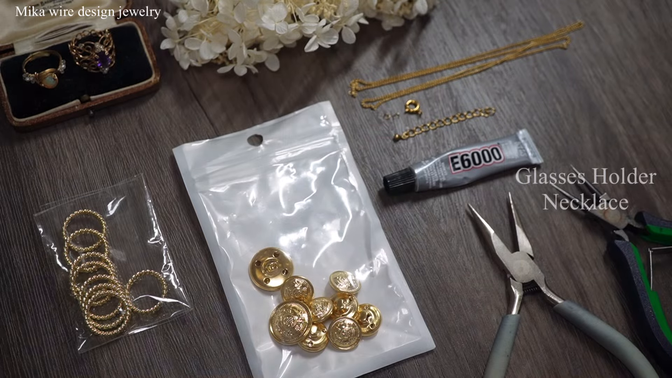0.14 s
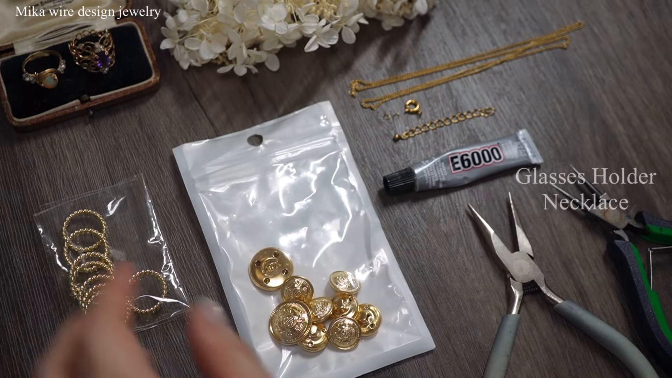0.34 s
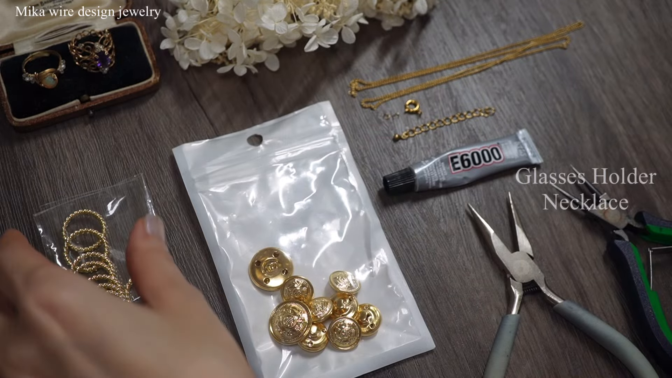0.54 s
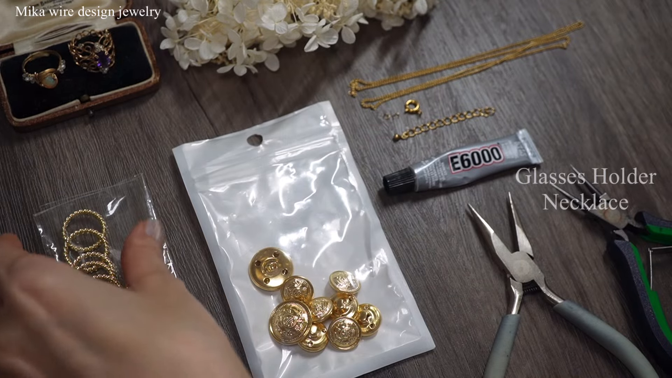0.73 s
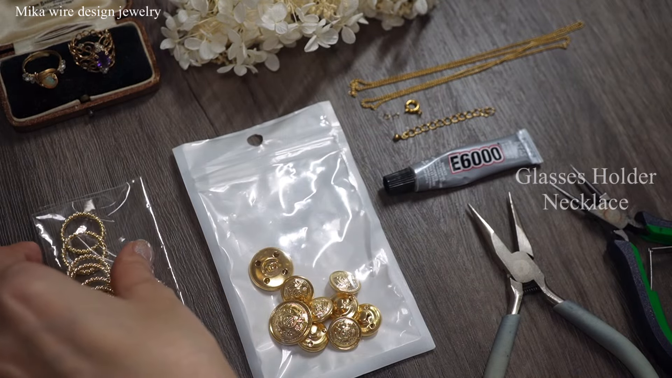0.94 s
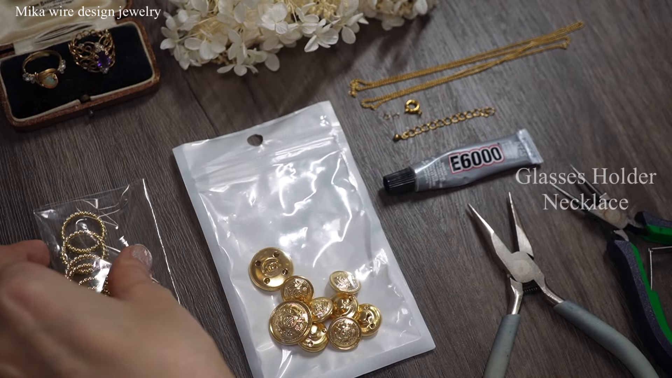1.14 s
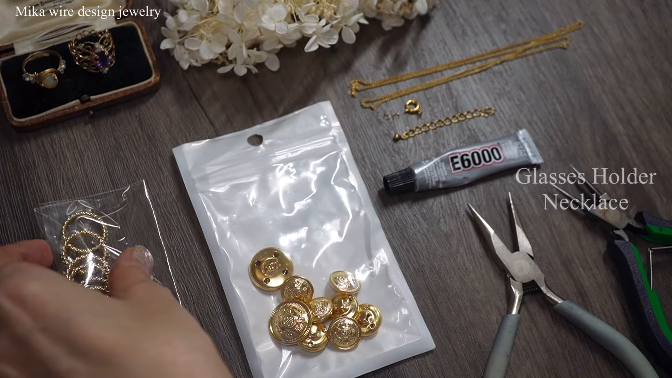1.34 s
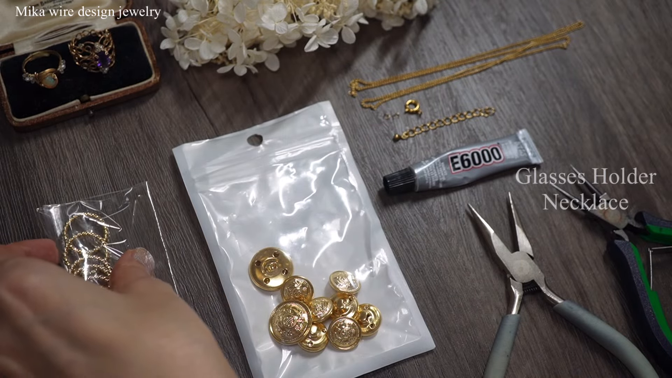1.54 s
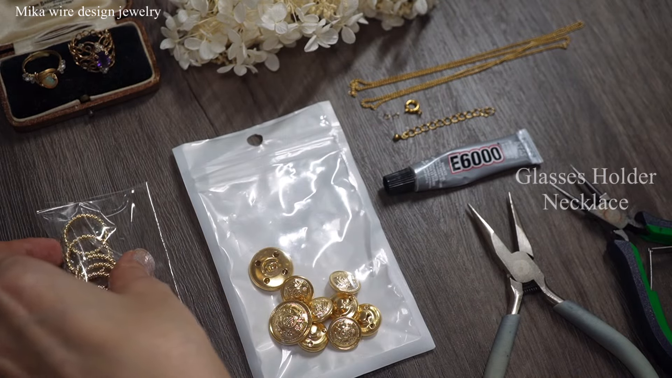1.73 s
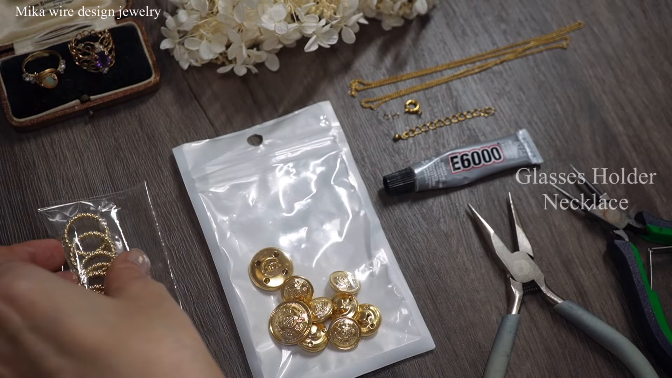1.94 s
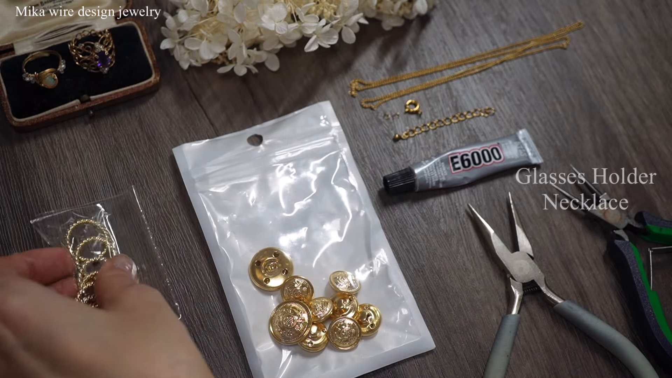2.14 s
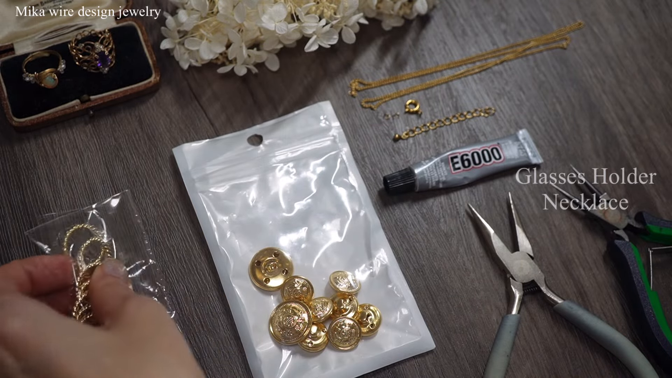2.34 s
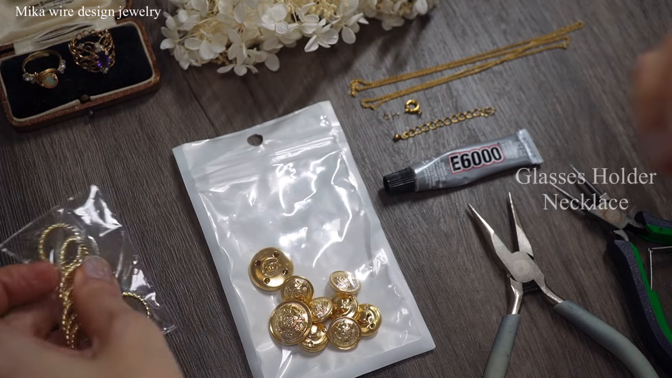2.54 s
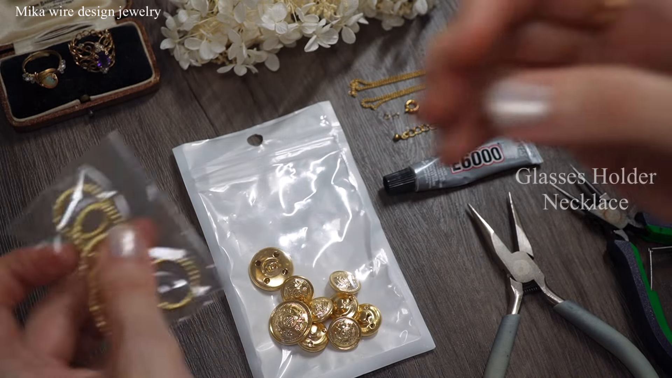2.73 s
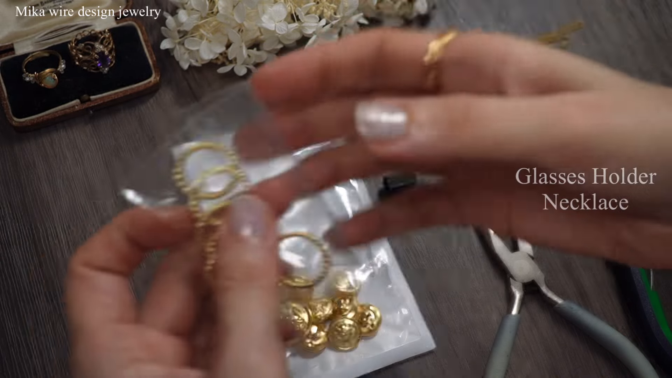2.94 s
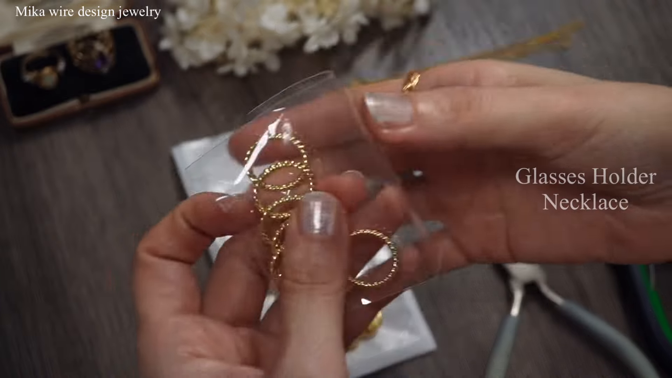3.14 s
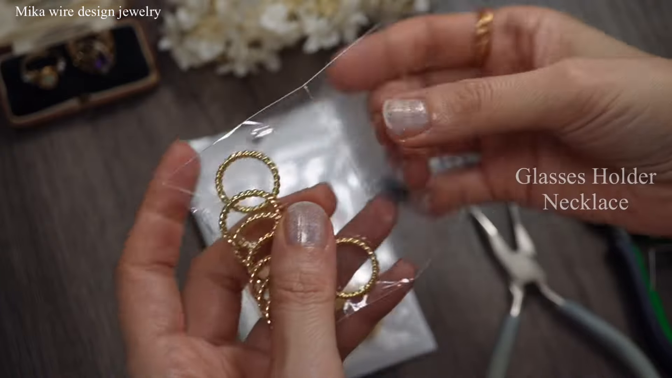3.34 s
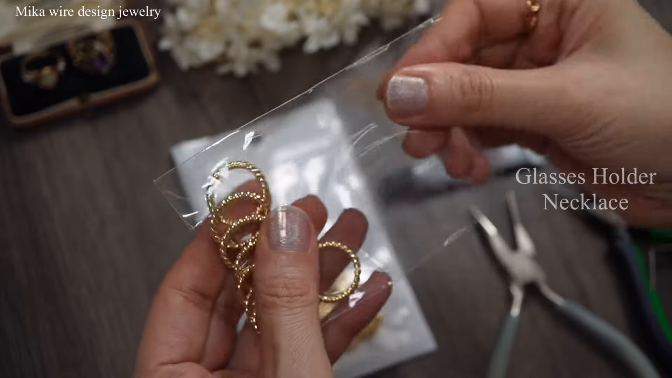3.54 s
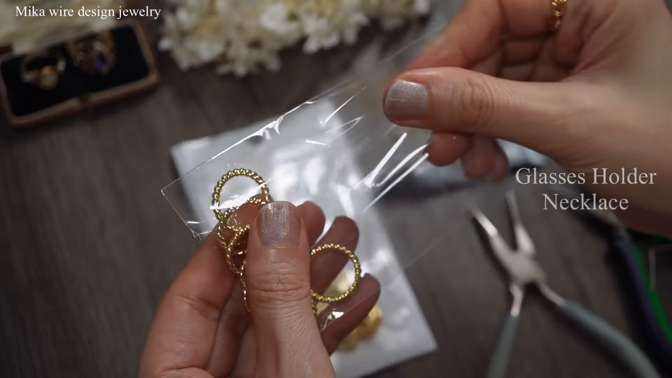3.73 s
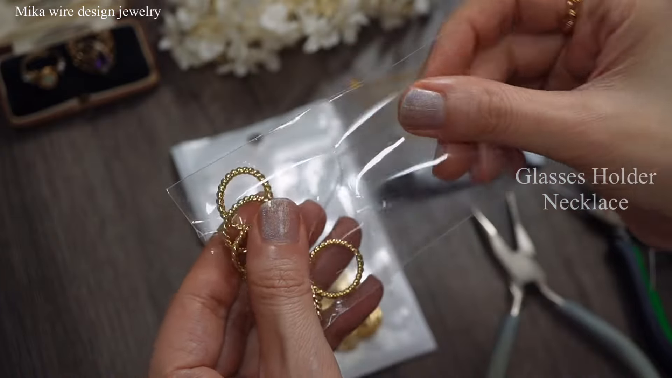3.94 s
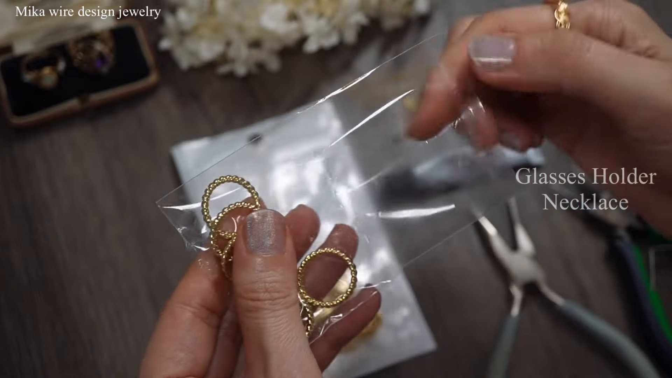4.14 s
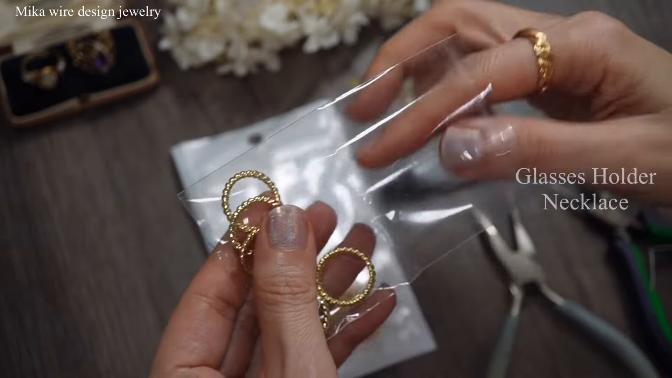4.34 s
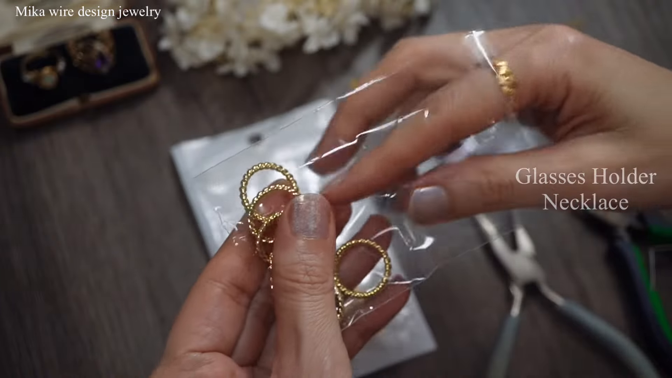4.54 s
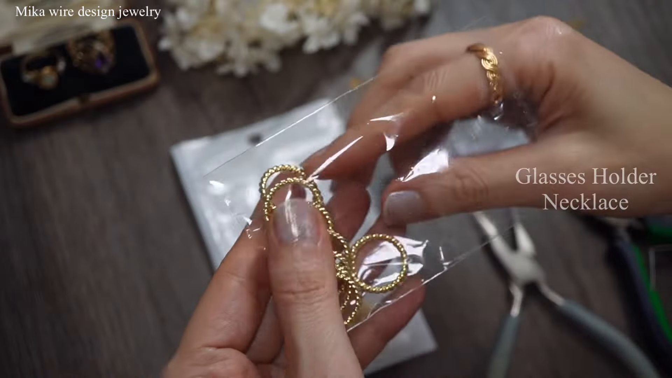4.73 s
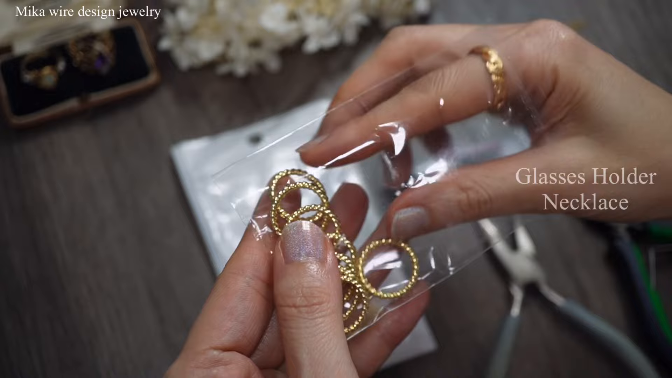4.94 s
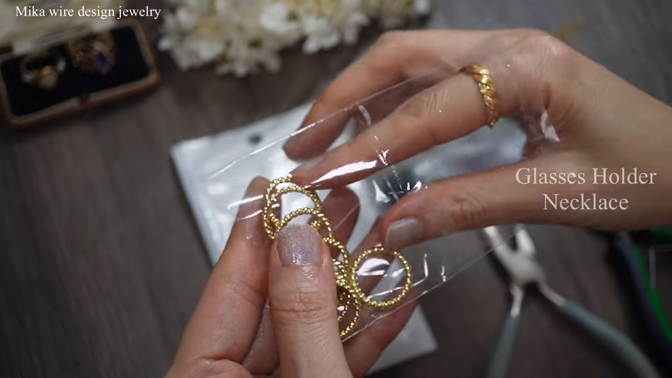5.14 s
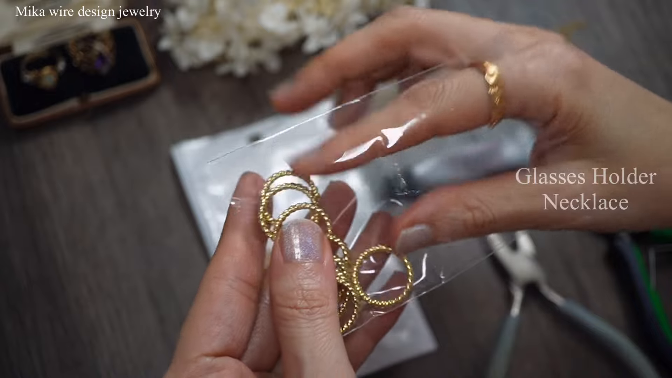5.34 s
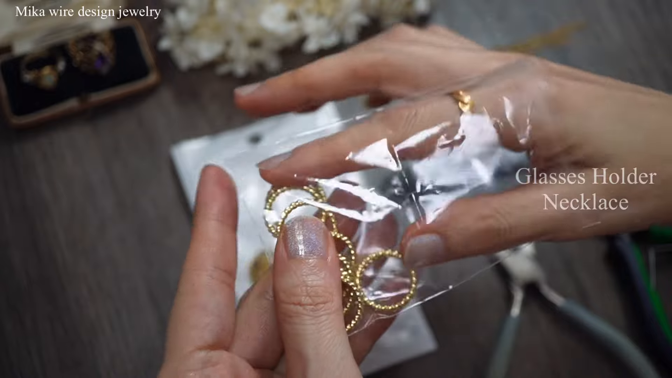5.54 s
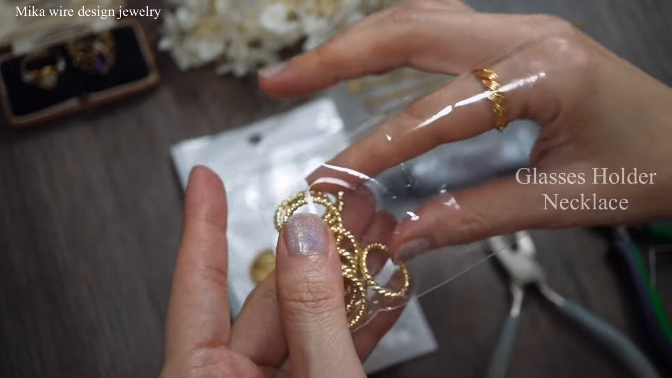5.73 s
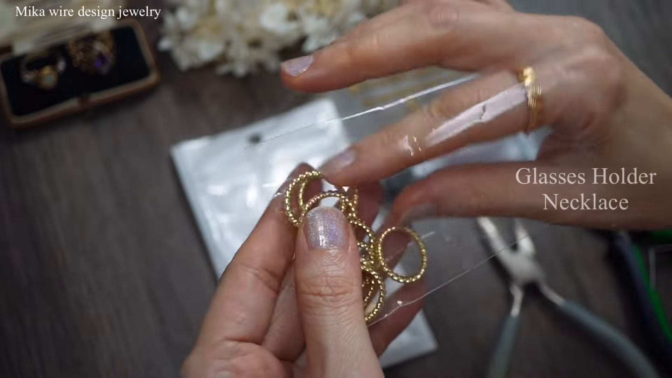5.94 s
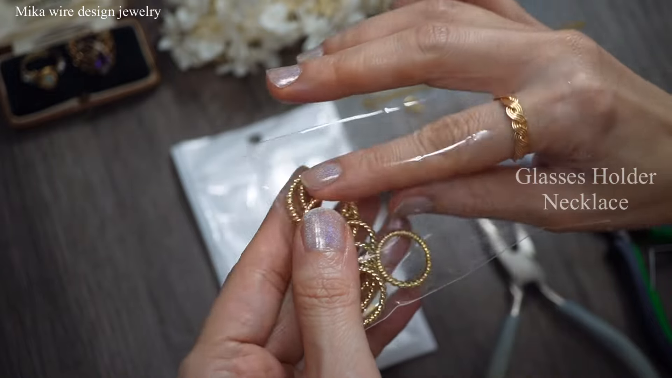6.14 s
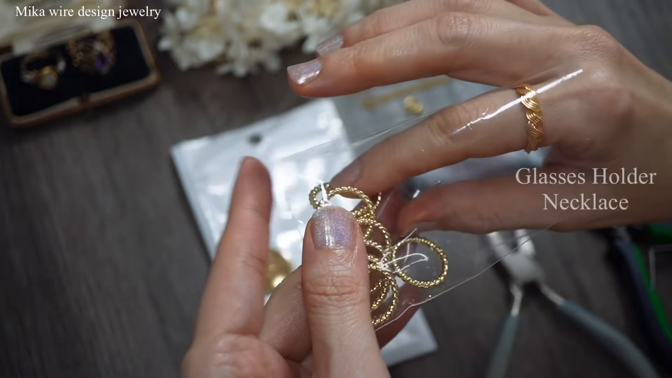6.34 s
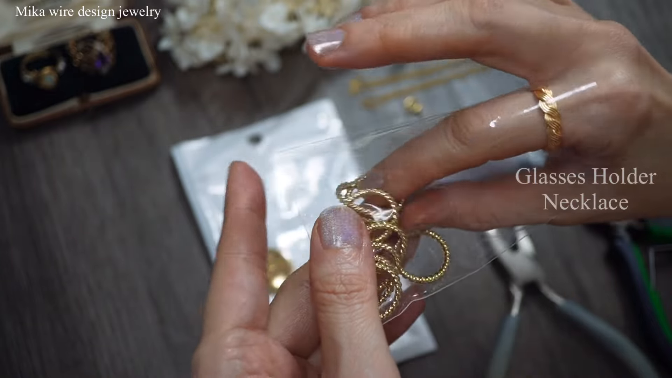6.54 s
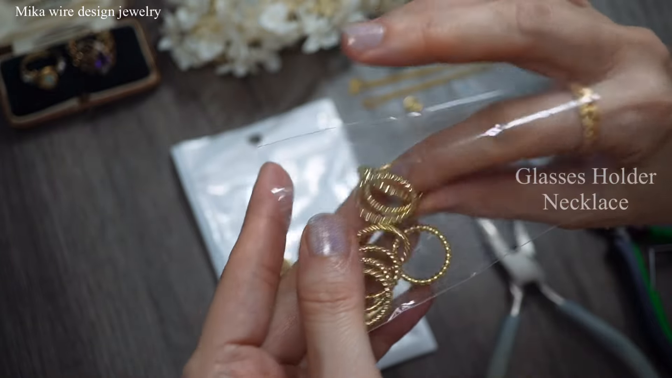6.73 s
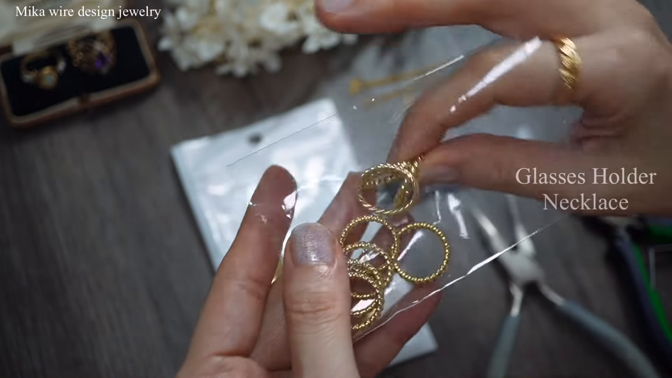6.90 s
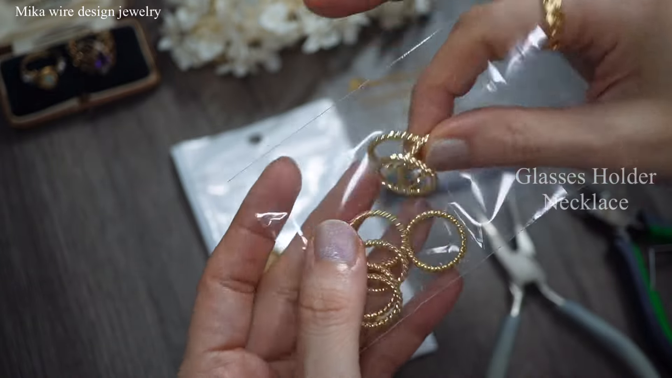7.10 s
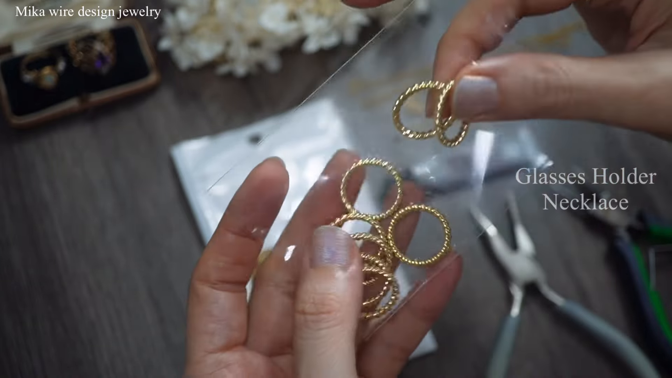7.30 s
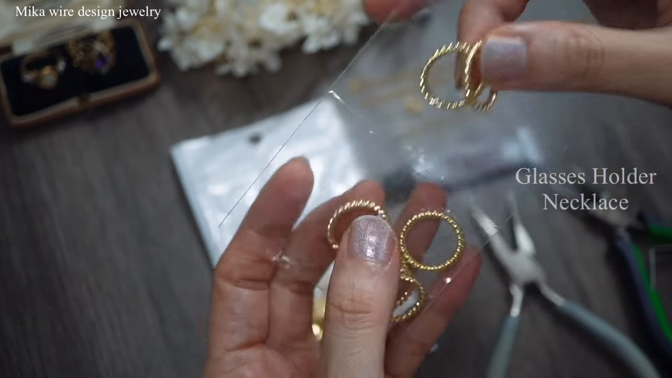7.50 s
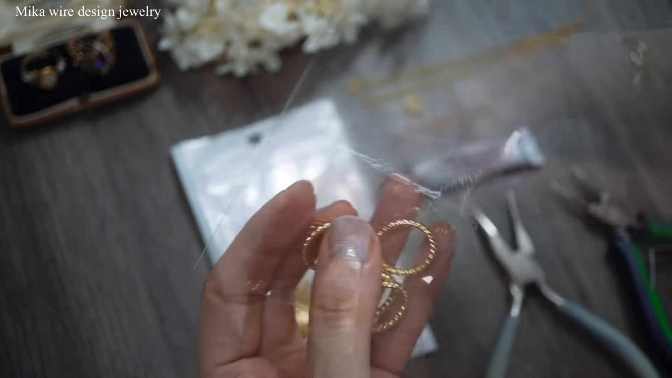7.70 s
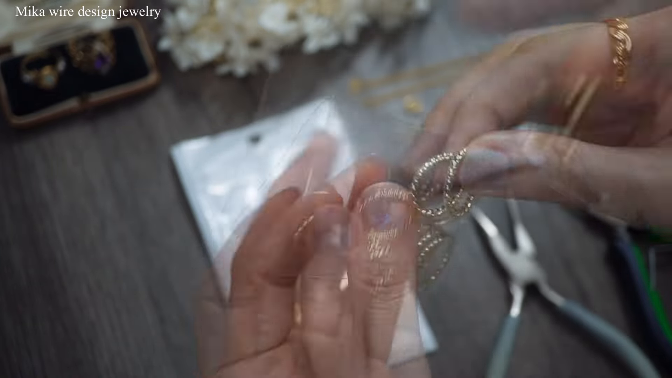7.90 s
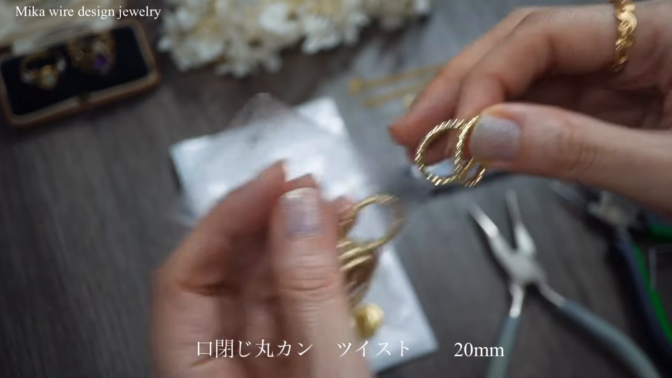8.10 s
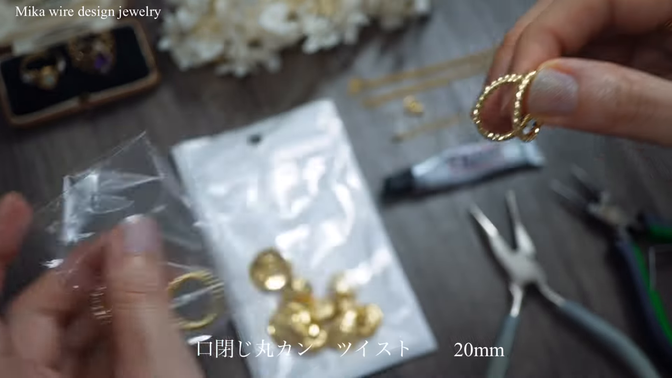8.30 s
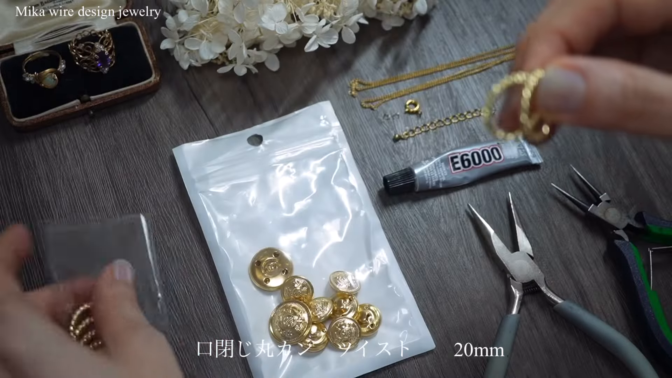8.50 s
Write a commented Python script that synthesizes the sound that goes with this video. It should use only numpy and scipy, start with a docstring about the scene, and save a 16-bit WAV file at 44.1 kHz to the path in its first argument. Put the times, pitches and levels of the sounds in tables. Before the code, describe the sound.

Fingers crinkle a small stiff plastic film bag close up, sharp crackles and snaps with faint metal ring jingles in a quiet room.

```python
"""A quiet room hums; then, close to a camera, fingers crinkle a small bag of thin stiff film.
A fine crackle of many small creases starts, and larger creases snap over it one by one: each is a burst
of noise coloured by the film. The bag starts left and thin; in its middle stretch it thumps more.
Metal rings soon jingle faintly now and then, as crowds of short sine notes, and the film slides softly,
in swells of tiny slips. Table and walls answer with noise tails, and the handling lasts to the end."""
import sys
import numpy as np
from scipy import signal
from scipy.fft import rfft, irfft, next_fast_len
from scipy.io import wavfile

SR = 44100
rng = np.random.default_rng(int(sys.argv[2]) if len(sys.argv) > 2 else 0)


def dump_mix(stems):
    """Bounce the given channels to the path in sys.argv[1] as a 16-bit WAV at rate SR."""
    frames = np.atleast_2d(stems).T  # one column per channel
    limited = np.clip(frames, -1, 1)  # hard clip at full scale
    pcm = np.round(limited * 32767).astype(np.int16)
    wavfile.write(sys.argv[1], SR, pcm)


def convert_level_to_amplitude(level_db):
    """Map a level in decibels to its linear amplitude factor."""
    exponent = np.asarray(level_db, float) / 20
    return 10 ** exponent


N = 381906  # samples
GRAIN, LEAD = 1024, 200  # length of a crease grain and its part before the peak, samples


def unit(x):
    """Scale each row to rms 1."""
    return x / np.sqrt(np.mean(x ** 2, -1, keepdims=True) + 1e-20)


def along(points, hz):
    """Read a curve of (Hz, value) points on a log frequency axis."""
    f, v = np.transpose(points)
    return np.interp(np.log(hz + 1), np.log(f + 1), v)


def causal(gain):
    """Minimum-phase response with the given gains, row by row."""
    cep = irfft(np.log(gain + 1e-6))
    half = cep.shape[-1] // 2
    cep[..., 1:half] *= 2
    cep[..., half + 1:] = 0
    return np.exp(rfft(cep))


def place(grains, s):
    """Sum the rows of grains into one track at their times."""
    at = np.round(s * SR).astype(int)[:, None] + np.arange(grains.shape[1])
    return np.bincount(at.ravel(), grains.ravel(), N + SR)[:N]


def swells(s, when, db, rise, fall):
    """Level in dB at times s of swells that build up to their peaks and die away."""
    late = s[:, None] - when
    power = convert_level_to_amplitude(db) ** 2 * np.exp(-2 * np.abs(late) / np.where(late < 0, rise, fall))
    return 10 * np.log10(power.sum(1) + 1e-14)


# Spectrum of room and microphone noise, relative: (pitch_hz, level_db per Hz)
AIR = [(20, -44), (36, -14), (60, -10), (200, -5.5), (520, -6), (800, -9.5), (1750, -8.5), (8000, -26),
       (16000, -35)]
# Likeness of left and right microphone port in that noise: (pitch_hz, correlation)
AIR_ALIKE = [(60, 0.98), (240, 0.93), (950, 0.84), (3770, 0.69), (15000, 0.062)]
# Low room resonances: (pitch_hz, width_hz, rise_db over the noise)
HUMS = [(53.5, 11, 9), (92.8, 6.3, 11.5), (199, 7.4, 11), (303, 22, 6.5)]


def air(level_db=-73.5):
    """Steady room noise with a few low resonances, less alike on the ports toward the treble."""
    m = next_fast_len(N)
    hz = np.fft.rfftfreq(m, 1 / SR)
    hum = 1 + sum((convert_level_to_amplitude(db) - 1) / (1 + (2 * (hz - centre) / width) ** 2) for centre, width, db in HUMS)
    colour = convert_level_to_amplitude(along(AIR, hz)) * hum
    turn = np.arccos(np.clip(along(AIR_ALIKE, hz), 0, 1)) / 2
    noise = rfft(rng.standard_normal((2, m)))
    mid, side = irfft(noise * colour * [np.cos(turn), np.sin(turn)], m)[:, :N]
    return convert_level_to_amplitude(level_db) * unit(np.array([mid + side, mid - side]))


# Air pushed by the bag, before the depth tilt: (pitch_hz, level_db)
THUMP = [(120, -65), (300, -15), (680, -5.5), (860, -5), (1070, 1), (1450, -4.5), (2100, 1), (3000, -23),
         (5000, -57)]
# Film as a whole: (pitch_hz, level_db)
BODY = [(700, -91), (1700, -20), (2300, -9), (4300, -2), (6500, -3.5), (9000, -24), (14000, -71.5)]
# Bright edge of the crease: (pitch_hz, level_db)
CRACK = [(3000, -83), (7000, -2.5), (10000, 0), (13000, -5), (15500, -9.5), (17000, -74.5)]
# Where the bag is: flat on the table it is thin and to the left, lifted it thumps more;
# the thump's depth changes from place to place.
# (time_s, left_over_right_db, crackle_thump_db, thump_depth_db_per_octave)
PLACE = [(0.8, 4, -36, 11), (2.2, 4, -27.5, -7), (3.4, 1, -12, 1), (5.4, 0.9, -12, -4.5),
         (7.2, 0, -23.5, 0), (8.66, 3, -9, -4.5)]


def creases(rows, sharp, patch_db, pan_spread_db, lag_spread):
    """Each crease gives suddenly and tears for a moment; its patch of film sings briefly at its own pitch.
    rows: (peak_s, body_db, pitch_hz, thump_db, crack_db, tear_ms). lag_spread is in samples.
    Returns left, right and what is sent all round into the room."""
    s, db, pitch, thump_db, crack_db, tear_ms = np.transpose(rows)[:, :, None]
    t, hz = (np.arange(GRAIN) - LEAD) / SR, np.fft.rfftfreq(GRAIN, 1 / SR)
    u = 1000 * t / np.clip(tear_ms, .04, 6)  # time in tear lengths
    tear = np.exp(-np.where(u < 0, (2.48 * u) ** 6, (1.47 * u) ** 2))
    jolt = rng.standard_normal((len(rows), GRAIN)) * tear
    # it catches and gives once more a moment later
    chance = rng.random((len(rows), 2))
    again = convert_level_to_amplitude(-5 - 13 * chance[:, :1]) * np.exp(-(u - 1.5 - 5 * chance[:, 1:]) ** 2)
    jolt += rng.standard_normal(jolt.shape) * again
    # the fold creeps a little before it gives and settles after
    creep = convert_level_to_amplitude(-18.5) * np.exp(-np.abs(t) / np.where(t < 0, .0012, .003))
    jolt += rng.standard_normal(jolt.shape) * creep

    patch = convert_level_to_amplitude(patch_db) / np.abs(1 + 1j * sharp * (hz / pitch - pitch / (hz + 1)))
    # a neighbouring, larger patch sings along at a chance lower pitch
    lower = pitch * np.exp(-.9 * rng.random((len(rows), 1)))
    patch = patch + convert_level_to_amplitude(patch_db - 3) / np.abs(1 + 1j * sharp * (hz / lower - lower / (hz + 1)))
    when, _, _, depth_db = np.transpose(PLACE)
    tilt_db = np.interp(s, when, depth_db) * np.log2(np.clip(hz, 300, 2500) / 1000)
    body = convert_level_to_amplitude(along(BODY, hz)) * (1 + patch)
    thump = convert_level_to_amplitude(along(THUMP, hz) - tilt_db)
    crack = convert_level_to_amplitude(along(CRACK, hz))

    near, around = 0, 0
    for gain, part_db in ((body, 0), (thump, thump_db), (crack, crack_db)):
        colour = causal(gain)
        part = rfft(jolt) * colour
        part *= convert_level_to_amplitude(db + part_db) / np.abs(irfft(part)).max(-1, keepdims=True)
        near = near + part
        # averaged over all directions the same energy has the smooth colour of the film
        energy = np.sqrt(np.mean(np.abs(part) ** 2, -1, keepdims=True))
        around = around + unit(np.abs(colour)) * energy * np.exp(1j * np.angle(part))
    # every crease sits at its own place: a small level and arrival difference between the ports
    chance = rng.standard_normal((len(rows), 2))
    lean_db = pan_spread_db * chance[:, :1]
    lag_s = lag_spread * chance[:, 1:] / SR
    left, right = [near * convert_level_to_amplitude(k * lean_db / 2) * np.exp(1j * k * np.pi * hz * lag_s) for k in (1, -1)]
    return np.array([place(irfft(z), s[:, 0] - LEAD / SR) for z in (left, right, around)])


# How hard the fingers work the film: (time_s, crackle_db before the flurries and the size of each crease)
HANDLING = [(0.8, -81), (1.04, -66.5), (1.54, -71), (1.96, -60), (2.07, -53), (2.29, -47), (2.42, -62),
            (2.64, -58), (2.77, -72), (3.01, -59.5), (3.34, -52), (3.86, -60), (4.15, -66.5), (4.45, -73),
            (4.61, -58), (4.98, -56), (5.22, -65), (5.44, -37), (5.505, -55), (5.56, -41), (5.72, -58),
            (5.99, -37), (6.12, -81), (6.23, -53), (6.53, -50.5), (7.19, -47), (7.35, -61), (7.72, -48.5),
            (8.0, -69.5), (8.18, -61), (8.35, -75.5), (8.66, -55.5)]


def crackle(count=1400):
    """Many small creases, as loud as the fingers press and louder round each snap; a few are much larger."""
    when, level_db = np.transpose(HANDLING)
    u, g = rng.random((count, 2)), rng.standard_normal((count, 4))
    s = when[0] + (when[-1] - when[0]) * u[:, 0]
    size_db = -4.0 * np.log(u[:, 1] + 0.036)
    # flurry of small creases 24.5 dB under each snap's peak, building up and settling
    snap_s, snap_db = np.transpose(SNAPS)[:2]
    flurry_db = swells(s, snap_s, snap_db - 24.5, rise=.003, fall=0.028)
    press_db = np.interp(s, when, level_db)
    db = 10 * np.log10(convert_level_to_amplitude(press_db) ** 2 + convert_level_to_amplitude(flurry_db) ** 2) + size_db
    pitch = 3900 * np.exp(0.36 * g[:, 0])
    place_s, _, place_thump_db, _ = np.transpose(PLACE)
    thump_db = np.interp(s, place_s, place_thump_db) + 4 * g[:, 1]
    crack_db = -16.0 + 0.88 * size_db + 3 * g[:, 2]  # small creases are duller
    tear_ms = 1.29 * np.exp(0.936 * g[:, 3])
    rows = np.transpose([s, db, pitch, thump_db, crack_db, tear_ms])
    return creases(rows, sharp=15, patch_db=17.5, pan_spread_db=1.5, lag_spread=1.0)


# How long the room rings: (pitch_hz, t60_s)
ROOM = [(500, 0.76), (3000, 0.24), (9000, 0.25), (16000, 0.095)]


def room(x, alike):
    """Table and walls answer; the hands keep moving, so the answer is new every quarter second."""
    step = SR // 4
    blocks = np.pad(x, (0, -N % step)).reshape(-1, step)
    hz, t, z = signal.stft(rng.standard_normal((len(blocks), 2, step)), SR, nperseg=128)
    # the table and the hands answer first and briefly, the walls longer
    walls = convert_level_to_amplitude(-60 * t / along(ROOM, hz)[:, None])
    table = 1.78 * convert_level_to_amplitude(-60 * t / 0.049)
    tails = signal.istft(z * (walls + table), SR, nperseg=128)[1]
    tails /= np.linalg.norm(tails, axis=-1, keepdims=True)
    turn = np.arccos(np.clip(alike, 0, 1)) / 2
    shared, own = np.cos(turn) * tails[:, 0], np.sin(turn) * tails[:, 1]
    start = np.arange(len(blocks)) * step / SR + 0.001003  # the answer comes about 1 ms late
    return np.array([place(signal.fftconvolve(blocks, shared + k * own, axes=1), start) for k in (1, -1)])


# Creases that stand out; body_db is the peak for a typical tear before panning, thump and crack are
# relative to it: (start_s, body_db, pitch_hz of the film patch, thump_db, crack_db)
SNAPS = [(0.834, -40.5, 3730, -22, -7), (0.85, -42, 4500, -32, -10), (0.907, -41, 3370, -25, -9),
         (0.945, -47, 3260, -28, -25), (1.056, -38.5, 5600, -25, -7), (1.0702, -44.5, 2520, -27, -9),
         (1.085, -47, 3500, -29, -13), (1.238, -46, 3060, -28, -9), (1.2516, -39, 5040, -33, -5),
         (1.2978, -33, 3520, -42, -15.5), (1.4283, -47, 5100, -35, -8), (1.5471, -38, 4000, -42, -9),
         (1.571, -37.5, 3530, -34, 5), (1.6044, -29, 6160, -32, -1.5), (1.806, -48.5, 5100, -37, 5.5),
         (1.8682, -35, 6040, -19, 0), (1.896, -23, 5400, -16.5, -6.5), (1.9265, -28, 4500, -36, -8),
         (1.951, -40, 3360, -25, -1), (2.0032, -41.5, 4760, -35, 12), (2.029, -29, 3430, -25, 0),
         (2.0418, -25.5, 5460, -51, -9), (2.095, -27.5, 4220, -49, 1), (2.135, -18.5, 3450, -51, -2.5),
         (2.172, -28, 3400, -37, 0), (2.2028, -23.5, 3540, -29, -4), (2.221, -16.5, 3680, -45, -3),
         (2.2324, -20.5, 6300, -27, -3.5), (2.2525, -13.5, 3370, -50, -11), (2.3045, -28, 3530, -46, -7),
         (2.3202, -28, 4800, -34, -0.5), (2.372, -25.5, 3400, -41, -7.5), (2.401, -28.5, 3400, -29, -0.5),
         (2.419, -28, 5100, -24, -6), (2.434, -35, 2300, -19, -14), (2.4482, -19.5, 5760, -27, -11),
         (2.543, -38.5, 3150, -25, -15), (2.6558, -32.5, 5250, -13, -14), (2.6942, -33.5, 4000, -10, -8.5),
         (2.78, -36.5, 4750, -6.5, -8), (2.827, -30.5, 5050, -23, -32), (2.9338, -29.5, 3140, -20, -15),
         (2.9495, -25.5, 4600, -25, -7.5), (2.9744, -29, 5800, -20, -5.5), (3.114, -23, 3940, -25, -8.5),
         (3.1323, -30, 5200, -15, -8), (3.157, -22.5, 3050, -21.5, -7.5), (3.167, -29, 4580, -29, -4),
         (3.211, -34.5, 3320, -31, -9), (3.2478, -25, 4450, -23, -10), (3.261, -17.5, 5400, -18.5, -3),
         (3.2695, -26, 4910, -30, -2.5), (3.3062, -32, 2070, -11, -20), (3.3266, -32, 5540, -34, -6),
         (3.3613, -33.5, 4500, -12, 0.5), (3.3719, -30, 2870, -9.5, -1), (3.3979, -29, 4660, -14, -7),
         (3.4043, -32, 2000, -13, -18), (3.424, -42, 2100, -5, -13), (3.4444, -29.5, 2100, -10.5, -9),
         (3.488, -29, 2100, -36, -21), (3.497, -19.5, 5200, -28, -14.5), (3.5138, -26, 4900, -16, -2),
         (3.5246, -17.5, 2150, -23.5, -11), (3.542, -27, 5700, -17, 2.5), (3.553, -25.5, 3040, -18, -8),
         (3.569, -24, 4900, -39, -14.5), (3.6353, -33.5, 5040, -7, -12), (3.642, -15.5, 4770, -19.5, -6.5),
         (3.6704, -21.5, 2780, -20, -7), (3.693, -23, 5170, -20, -2), (3.7126, -28.5, 5150, -9, -8),
         (3.7505, -31.5, 5000, -31, 2.5), (3.7627, -26.5, 5500, -44, -4), (3.798, -28.5, 4600, -47, -7),
         (3.812, -33.5, 3150, -14, -10), (3.8449, -33.5, 6230, -14, -6), (3.8597, -21.5, 6500, -17, -5),
         (3.9081, -24, 5100, -15, -1.5), (3.9228, -18, 6050, -14, -4), (3.9465, -27, 1830, -4, -3),
         (3.9804, -21, 4640, -46, -13), (3.987, -26.5, 5500, -34, -6), (4.0574, -44, 1700, -1.5, -14),
         (4.07, -43, 3200, 0, -5), (4.1822, -39.5, 4820, -23.5, -4.5), (4.343, -47.5, 2060, -11, -9),
         (4.4236, -32, 4440, -10.5, -4.5), (4.448, -34, 3900, -12, -5), (4.4716, -25, 4600, -15.5, -10.5),
         (4.4818, -25.5, 5900, -11, -10), (4.511, -31, 4630, -12, -9), (4.541, -29, 4550, -25, -2),
         (4.5489, -15, 5850, -18.5, -3.5), (4.567, -16, 4670, -17, -9), (4.578, -18, 4480, -15.5, -9),
         (4.6407, -29.5, 2810, -13, -11), (4.6749, -13, 5300, -58, -17.5), (4.6883, -22.5, 4130, -25, 0),
         (4.7018, -17.5, 4450, -14, -5.5), (4.7452, -24.5, 5050, -17, -10),
         (4.8649, -26.5, 5330, -19.5, -23), (4.8917, -35, 5330, -18, -6), (4.9047, -28, 5100, -23, -15),
         (4.917, -22.5, 4140, -32, -11), (4.9979, -28.5, 3060, -10, -15), (5.0245, -32, 1940, -11, -18),
         (5.038, -37, 2140, -8, -23), (5.09, -38, 4600, -30, -11), (5.1321, -30, 4770, -15, -2),
         (5.1484, -31, 4670, -10.5, -8), (5.225, -30.5, 3920, -11, -4), (5.2677, -23.5, 5240, -12.5, -7.5),
         (5.299, -25.5, 4800, -21, -11.5), (5.3244, -25.5, 5600, -12, -8), (5.3465, -28.5, 2640, -10, -4),
         (5.3688, -15.5, 3200, -12.5, -10), (5.4097, -30, 2760, -10.5, -16),
         (5.4316, -20.5, 5100, -27, -16), (5.4483, -23, 4830, -16, -5), (5.4774, -28, 2790, -10.5, -10),
         (5.5176, -23.5, 4100, -16, -10.5), (5.5551, -23, 7540, -14, -4), (5.5641, -22, 3840, -16, -5.5),
         (5.5777, -20.5, 3800, -16, -6), (5.5929, -23.5, 2900, -23, -13), (5.5978, -24, 2590, -20, -13),
         (5.6042, -21.5, 4400, -18, -7), (5.64, -24, 3700, -35, -7), (5.6551, -28, 4070, -29, -11),
         (5.6643, -24.5, 5180, -11.5, -3), (5.6743, -28, 5270, -19, -4), (5.697, -29, 2560, -9, -13),
         (5.7307, -35.5, 6900, -11, -3), (5.7457, -29, 2730, -57, -8.5), (5.7862, -33.5, 5240, -49, -9),
         (5.815, -35, 4320, -29, -4), (5.8324, -28, 4000, -10.5, -13), (5.889, -21, 5240, -16.5, -9),
         (5.91, -20.5, 4320, -20, -12), (5.9169, -18.5, 4270, -46, -1.5), (5.9653, -19.5, 3140, -33, -3.5),
         (5.9729, -14, 4530, -20, -38), (5.9961, -20, 4240, -26, 0.5), (6.019, -11.5, 4380, -22.5, -7),
         (6.0689, -28.5, 4520, -10, -10), (6.113, -12.5, 2250, -22, -2), (6.1543, -29, 5400, -41, 4.5),
         (6.226, -27, 3140, -26, -7), (6.2443, -26.5, 5200, -15, -12), (6.2626, -19, 4300, -22.5, -2),
         (6.305, -13, 5100, -20, -8), (6.3298, -30.5, 2570, -25, -13), (6.3953, -23.5, 5190, -21, -4.5),
         (6.403, -24, 3980, -16, -16), (6.44, -32, 2500, -10, -55), (6.541, -37.5, 5260, -13, -3),
         (6.5624, -27, 7200, -22, -0.5), (6.602, -29, 2900, -23.5, -14.5), (6.7185, -21.5, 2570, -22, -7),
         (6.7348, -16, 4420, -19.5, -18), (6.7483, -25.5, 4400, -21, -2), (6.7762, -8.5, 4200, -24, -11.5),
         (6.8017, -23, 4000, -46, -18), (6.8073, -25, 4130, -24, -1), (6.8514, -39, 5030, -30, -3),
         (6.879, -33, 2600, -11, -13), (6.9523, -34, 3380, -15, -6), (6.9916, -24.5, 5070, -24, -4.5),
         (7.0053, -31.5, 4070, -14, -5), (7.034, -29.5, 4520, -20, 1), (7.0489, -21.5, 3670, -17, -11),
         (7.1176, -24.5, 2730, -17.5, -5.5), (7.1493, -29, 3820, -7.5, -2), (7.1686, -18, 3150, -17.5, -18),
         (7.1922, -20, 3350, -11, 5.5), (7.243, -21, 3700, -20.5, -5), (7.2838, -34, 4130, -12, -13),
         (7.299, -33.5, 3100, -28, -13), (7.3146, -34.5, 4020, -16, -7.5), (7.3536, -11.5, 4460, -28, -10),
         (7.5365, -19.5, 6700, -20, -2), (7.56, -32, 4230, -33, -0.5), (7.5913, -13.5, 4450, -57, -9.5),
         (7.6464, -41, 1700, -24, -8), (7.655, -31, 4440, -32, -4), (7.6689, -36, 2950, -11, -2),
         (7.6804, -32.5, 3960, -23, -18), (7.6898, -28, 4070, -15.5, -23), (7.7867, -38, 3760, -18, -1),
         (7.832, -29, 5400, -20, -10), (7.885, -42, 3140, -16, -19), (7.9587, -25.5, 7400, -16, -9),
         (7.996, -32.5, 2860, -15, -8), (8.0118, -28.5, 2860, -10, -5.5), (8.131, -44, 4490, -3, -27),
         (8.1766, -40.5, 2960, -22, -36), (8.1955, -47.5, 3000, -14, -29),
         (8.3251, -29.5, 4360, -14.5, -12.5), (8.533, -37.5, 6000, -17, -20), (8.625, -25, 5330, -16, -4.5)]


def snaps():
    """Each snap tears for a chance time, and a longer tear spreads its energy thinner."""
    s, db, *colour = np.transpose(SNAPS)
    longer = np.exp(0.3 * rng.standard_normal(len(SNAPS)))
    peak_s = s + .0008  # the peak comes just after the start
    tear_ms = 0.71 * longer
    rows = np.transpose([peak_s, db - 10 * np.log10(longer), *colour, tear_ms])
    return creases(rows, sharp=11.6, patch_db=10.0, pan_spread_db=1.0, lag_spread=0.78)


# Rings shaken against each other; length_s is twice the fall time, level_db is before uneven touches:
# (peak_s, level_db, length_s, pitch_hz)
JINGLE = [(1.625, -50, 0.056, 9000), (1.7, -51, 0.033, 9300), (1.933, -46.5, 0.045, 9200),
          (2.062, -46, 0.037, 9300), (3.227, -46.5, 0.056, 9000), (4.722, -35.5, 0.065, 8940),
          (5.932, -38, 0.034, 9140), (6.2, -53.5, .12, 9050), (6.69, -50, 0.1, 9050),
          (6.882, -51, .06, 9030), (6.97, -46, 0.098, 9140), (7.047, -43, 0.029, 8950),
          (7.11, -44, .04, 9100), (7.153, -39, 0.06, 9050), (7.245, -45.5, 0.15, 9150),
          (7.347, -40.5, 0.089, 9110), (7.495, -49, 0.058, 9100), (7.67, -51, 0.05, 9000),
          (7.724, -44, 0.073, 9250)]


def rings(count=2400):
    """Near-twin rings touch unevenly, many times a second; each touch wakes a short note near their pitch."""
    s, g = rng.random(count) * N / SR, rng.standard_normal((count, 3))
    when, shake_db, length, pitch = np.transpose(JINGLE)
    shake = swells(s, when, shake_db, rise=.3 * length / 2, fall=length / 2)
    db = shake[:, None] + 4.5 * g[:, :1]  # uneven touches
    hz = np.interp(s, when, pitch)[:, None] * (1 + .011 * g[:, 1:2])  # pitch scatter among rings
    t = np.arange(SR // 40) / SR
    decay = convert_level_to_amplitude(db - 60 * t / .019)  # t60 19 ms
    notes = decay * np.sin(2 * np.pi * hz * t) * (1 - np.exp(-t / .0005))
    pan_db = 2.5 * g[:, 2:]
    left, right = place(notes * convert_level_to_amplitude(pan_db), s), place(notes * convert_level_to_amplitude(-pan_db), s)
    return np.array([left, right, (left + right) / 2])


# Film sliding softly over skin or table, level_db before the scatter of the slips:
# (middle_s, length_s, level_db, pitch_hz)
SLIDES = [(1.92, 0.063, -68.5, 1570), (2.3, .3, -64, 1600), (1.71, 0.025, -61.5, 4600),
          (7.4, 0.12, -64, 4400), (7.71, 0.12, -62.5, 1980), (7.74, 0.11, -64, 3680),
          (8.235, 0.064, -67.5, 4600)]


def slides(count=160):
    """Each slide is a dense swell of tiny slips, a few cycles long, scattered round its pitch."""
    s, length, db, pitch = np.repeat(SLIDES, count, 0).T[:, :, None]
    g = rng.standard_normal((len(s), 3))
    hz, t = pitch * np.exp(0.17 * g[:, :1]), np.arange(GRAIN // 2) / SR
    size = convert_level_to_amplitude(db + 8.2 * g[:, 1:2]) * np.sqrt(hz * length / count)
    slips = size * np.sin(2 * np.pi * hz * t) * hz * t * np.exp(-hz * t / 1.35)
    start = s + length / 2 * g[:, 2:]
    track = place(slips, start[:, 0])
    return np.array([track] * 3)


def scene():
    """Bag and rings with their echo lean to the side where the bag is held; the room's noise stays."""
    left, right, around = crackle() + snaps() + rings() + slides()
    bag = np.array([left, right]) + convert_level_to_amplitude(-8.5) * room(around, alike=0.96)
    lean_db = np.interp(np.arange(N) / SR, *np.transpose(PLACE)[:2])
    return bag * convert_level_to_amplitude(np.array([lean_db, -lean_db]) / 2) + air()


def top_cut(x):
    """Nothing passes above the cut-off."""
    return signal.sosfilt(signal.butter(12, 16990, fs=SR, output="sos"), x)


def record(dry):
    """The camera takes the two port signals as they are, at their own level."""
    return top_cut(dry)


dry = scene()
out = record(dry)
dump_mix(out)
```